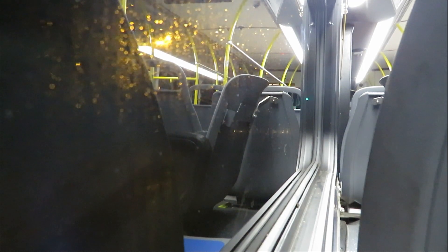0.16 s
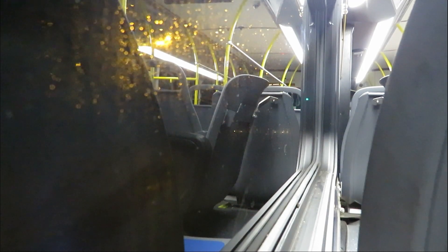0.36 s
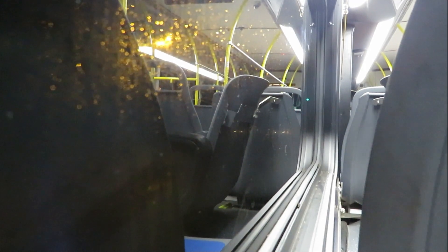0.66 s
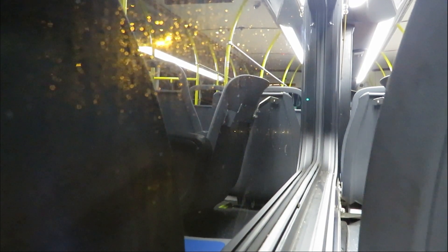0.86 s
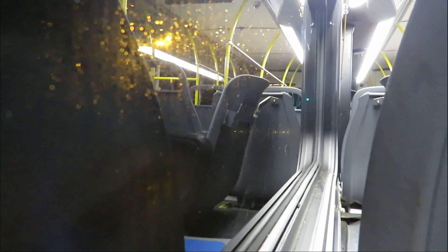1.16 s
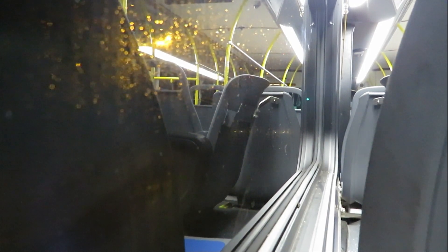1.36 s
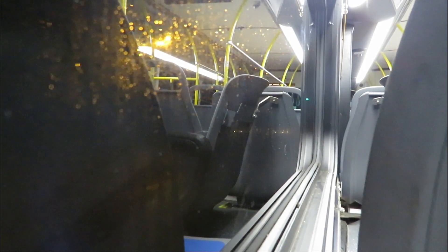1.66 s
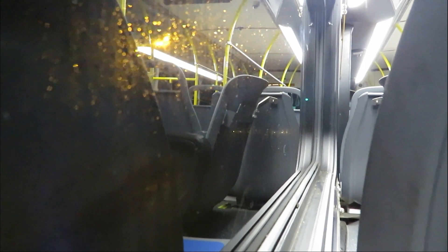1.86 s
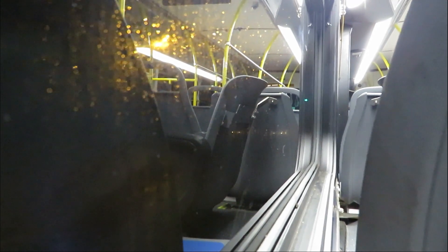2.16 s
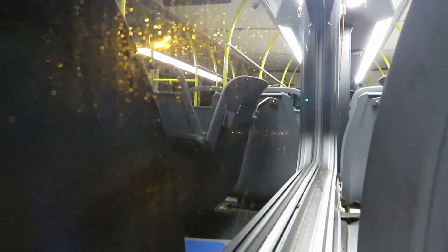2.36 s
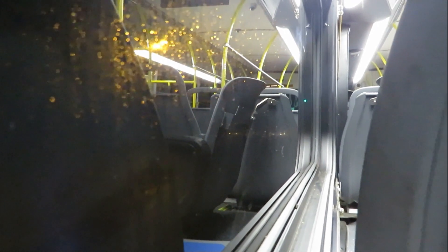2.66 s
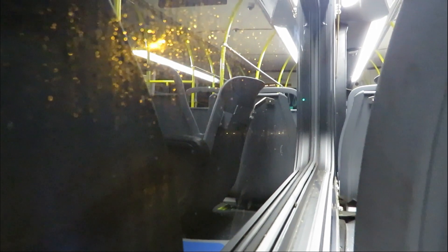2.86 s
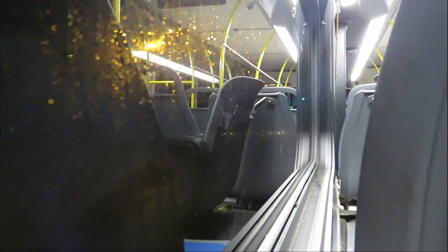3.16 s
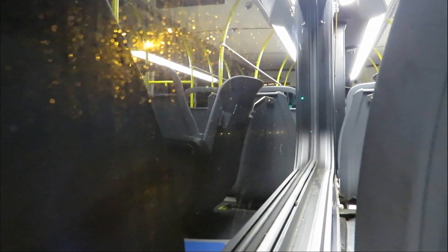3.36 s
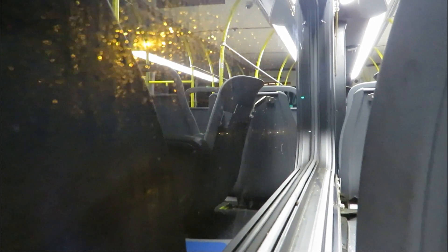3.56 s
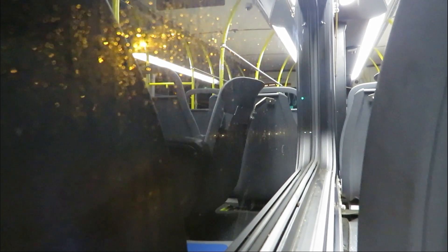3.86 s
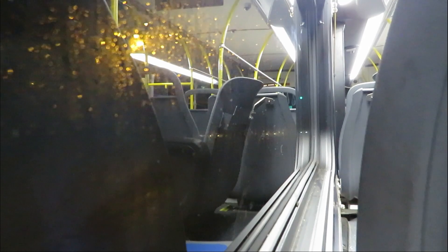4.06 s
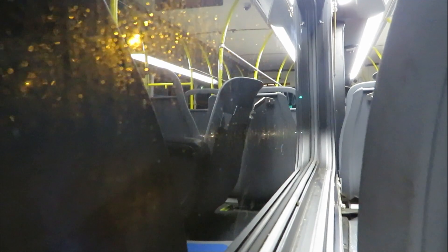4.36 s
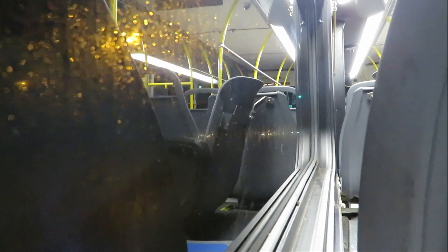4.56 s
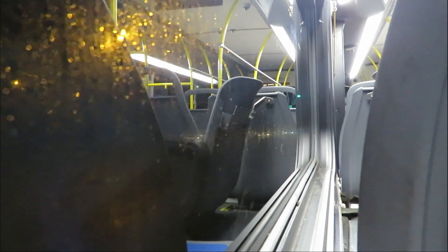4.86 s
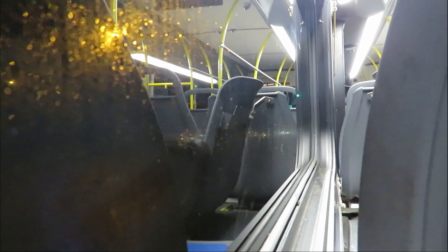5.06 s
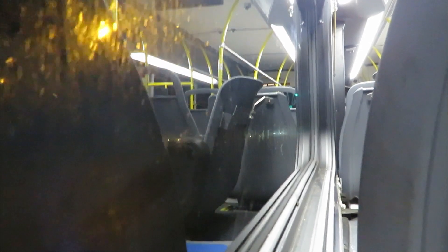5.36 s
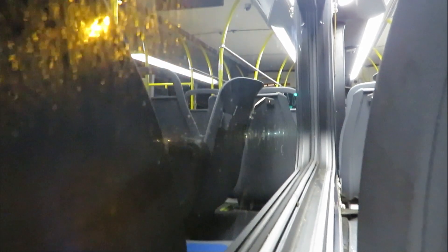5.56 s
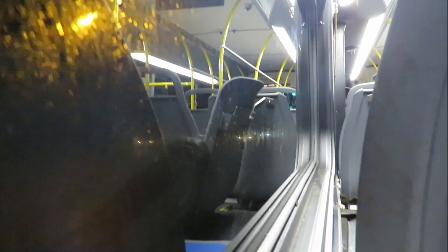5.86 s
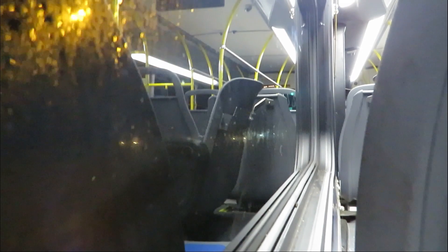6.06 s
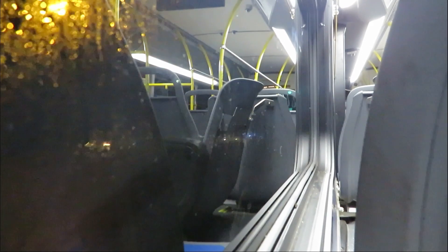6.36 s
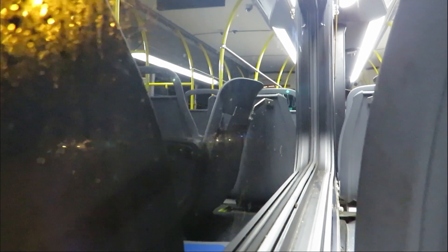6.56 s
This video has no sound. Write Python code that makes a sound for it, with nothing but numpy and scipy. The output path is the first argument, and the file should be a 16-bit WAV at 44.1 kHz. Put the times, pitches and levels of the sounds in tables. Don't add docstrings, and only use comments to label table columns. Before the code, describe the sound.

Inside an empty electric bus, close to a window, fans and a compressor drone low and steady. After a second the brakes let out a short airy hiss with brief hollow moans. Then the motor takes up, its deep hum climbing smoothly and swelling as it meets cabin resonances. Near the end, bumps thud, fittings tick, metal squeaks and a scrape grows.

```python
import sys
import numpy as np
from scipy import signal
from scipy.fft import rfft, irfft, next_fast_len
from scipy.io import wavfile
from scipy.ndimage import uniform_filter1d, map_coordinates

SR = 44100
rng = np.random.default_rng(int(sys.argv[2]) if len(sys.argv) > 2 else 0)


def gain_from_db(level_db):
    decades = np.asarray(level_db, float) / 20
    return 10 ** decades


def materialize(psi):
    bounded = np.clip(np.atleast_2d(psi).T, -1, 1)
    quanta = np.round(bounded * 32767).astype(np.int16)
    wavfile.write(sys.argv[1], SR, quanta)


N = 295911

# f/Hz, side over mid level/dB
STEREO_WIDTH = [(60, -32), (110, -26.5), (200, -24.5), (360, -20), (640, -31.5), (1160, -12.5),
                (2100, -15.5), (3810, -8.5), (6890, -3), (12500, 3.5)]
# t/s, level/dB
BACKGROUND_LEVEL = [(0, -30), (.25, -30), (.45, -33), (.8, -31), (1, -31), (1.65, -33), (1.95, -31), (2.75, -31),
                    (3.02, -33.5), (3.5, -32), (3.9, -32), (4.1, -35.5), (4.55, -32.5), (4.72, -35.5), (5.15, -32),
                    (5.9, -33.5), (6.15, -31.5), (6.45, -33.5)]
# f/Hz, density level/dB
VENT_AIR = [(260, -45), (450, -1.5), (504, -1.5), (778, -8.5), (961, -8), (1110, -11), (1480, -16),
            (2680, -19), (5330, -33.5), (10600, -53), (12900, -71), (16800, -98), (22000, -120)]
# f/Hz, density level/dB
BODY_RUMBLE = [(8, -33), (30, -30), (38, -21), (50, -2.5), (90, -6.5), (135, -6.5), (185, -1.5), (260, -5),
               (350, -11.5), (500, -16.5), (800, -27.5), (1200, -71)]
# f/Hz, rms level/dB, width/Hz
DRONE_LINES = [(48.56, -28.5, 3), (96.85, -26.5, 5), (288.8, -26.5, 4), (414.3, -27, 5), (503, -36.5, 8),
               (557, -40, 8), (987, -39.5, 22), (3960, -57.5, 4.8)]
# t/s of the crest, level/dB, length/s
ROAD_BUMPS = [
    (5.372, -24.5, 0.11),
    (5.58, -21.5, .16),
    (6.15, -28.5, .3),
    (6.52, -25.5, .08),
    (6.71, -19, .06),
]
# f/Hz, density level/dB
AXLE_THUD = [(25, -31), (48, 0), (110, -8), (220, -30), (400, -70)]
# t/s, peak level/dB, centre f/Hz, width/octaves, t60/s
RATTLES = [
    (0.86, -44, 6500, .4, .3),
    (2.265, -44, 7000, .6, .05),
    (3.66, -49, 9000, .4, .04),
    (6.655, -38, 4000, .6, .1),
    (4.014, -32, 5000, 1.2, .035),
    (5.318, -34, 4800, .5, .07),
    (5.455, -38, 5200, .75, .2),
]
# t/s, length/s, f/Hz, level/dB, echo level/dB
SQUEAKS = [
    (5.535, .05, 6320, -48.5, -4),
    (5.6, .04, 6180, -53, -1),
    (5.533, .045, 8560, -48, -5),
    (6.543, .065, 3920, -41, -8),
    (6.56, .045, 7420, -52, -4),
    (6.56, .04, 12550, -66, -8),
]
# f/Hz, density level/dB
SCRAPE_SPECTRUM = [(880, -36.5), (1500, -3.5), (2270, -5), (3170, -13.5), (4040, -13.5), (6570, -25.5),
                   (7120, -15.5), (12900, -44), (16800, -79), (22000, -120)]
# f/Hz, width/Hz, level/dB
SCRAPE_PEAKS = [(2290, 80, 6), (3920, 200, 4), (6000, 220, 12), (6930, 150, 6), (7500, 300, 3)]
# f/Hz, density level/dB
VALVE_JET = [(820, -43), (1400, -8.5), (1670, -3), (1900, -4.5), (2630, -4.5), (2860, -6), (4000, -8),
             (8900, -22.5), (11500, -32.5), (12900, -39.5), (16800, -63.5), (22000, -120)]
# f/Hz, density level/dB
VALVE_PUFF = [(300, -40), (550, -9.5), (900, 6), (1300, 0.5), (1600, -25.5)]
# f/Hz, width/Hz, level/dB
OPENING_PEAKS = [(2170, 120, 4), (2420, 100, 0), (3240, 140, 9), (6430, 150, 3)]
# f/Hz, width/Hz, level/dB
CLOSING_PEAKS = [(1615, 130, 5.9), (2200, 60, 4), (2570, 70, 5.4), (2900, 80, 3.7)]
# t/s, length/s, f/Hz, glide/(Hz/s), level/dB
MOAN_NOTES = [
    (1.25, .04, 427, 0, -25),
    (1.345, .05, 505, 0, -17),
    (1.525, .15, 445, 0, -19),
    (1.7, .055, 430, -600, -20),
    (2.36, .14, 76, 110, -22),
    (4.44, .15, 366, 110, -28),
]
# f/Hz, width/Hz, level/dB
CABIN_MODES = [(68, 8, 0), (85, 7, -3), (100, 3.5, -2), (116, 4, 1), (128, 3, -6), (146, 6, 1),
               (167, 3.5, -4), (177.5, 6, 4), (196.5, 4, 2), (206, 4, -8), (229, 4, 1), (237, 4, -4),
               (249, 4, -7), (294, 6, -2), (310, 6, -5), (334, 5, -11), (347, 6, -9), (365, 9, -6),
               (387, 5, -8), (615, 14, -2)]
# t/s, f/Hz
MOTOR_SPEED = [(2.6, 36), (4.01, 179), (4.54, 229), (4.78, 247), (5.2, 293), (6.71, 423)]
# t/s, main order level/dB, half order level/dB
MOTOR_LOAD = [(2.9, -15.5, -50), (3.2, -14.5, -35), (4.0, -14.5, -26.5), (4.8, -17, -33), (5.2, -18, -25),
              (5.5, -17.5, -21), (5.64, -20, -23), (5.77, -20.5, -15.5), (6.1, -23, -18.5),
              (6.35, -19.5, -21), (6.71, -16.5, -16)]
# multiple of the main order, level/dB relative to it
MOTOR_OVERTONES = [(1.5, -20), (1.64, -20), (2, -15), (3, -20)]

VALVE_OPEN_S, VALVE_TURN_S, VALVE_SHUT_S = 1.017, 1.13, 1.36
HISS_DB, TURN_DIP_DB = -28.5, 2
PUFF_DB, PUFF_STAYS_DB = -25, -19.5
SCRAPE_S, SCRAPE_DB, SCRAPE_GROWS_DB_PER_S = 6.505, -43, 8
ECHO_T60_S = .55
PULL_S, TAKE_UP_S = 2.647, .2
DUCK_DB, DUCK_KNEE_DB, DUCK_RECOVER_S = 2, -15, 0.15


def unit(x):
    return x / np.sqrt(np.mean(x ** 2) + 1e-20)


def along(points, hz):
    f, value = np.transpose(points)
    return np.interp(np.log(hz + 1), np.log(f + 1), value)


def curves(rows):
    s, *columns = np.transpose(rows)
    return [np.interp(np.arange(N) / SR, s, column) for column in columns]


def wobble(rate):
    knots = rng.standard_normal(int(N * rate / SR) + 4)
    return map_coordinates(knots, [np.arange(N) * rate / SR])


def filtered(x, response):
    m = next_fast_len(N + SR // 2)
    return irfft(rfft(x, m) * response(np.fft.rfftfreq(m, 1 / SR)), m)[..., :N]


def rush(spectrum, patchy_db, peaks=()):
    z = signal.stft(rng.standard_normal((2, N)), nperseg=512)[2]
    field = uniform_filter1d(rng.standard_normal(z.shape[1:]), size=6, axis=0)
    field = uniform_filter1d(field, size=12, axis=1)
    pair = signal.istft(z * gain_from_db(patchy_db * unit(field)), nperseg=512)[1][:, :N]

    def response(hz):
        lift = sum(db / (1 + (2 * (hz - c) / w) ** 2) for c, w, db in peaks)
        return gain_from_db(along(spectrum, hz) + lift) * [hz ** 0, gain_from_db(along(STEREO_WIDTH, hz))]

    mid, side = filtered(pair, response)
    return unit(np.array([mid + side, mid - side]))


def burst(start, rise, sag_db, end=np.inf, dies_db=0):
    t = np.arange(N) / SR - start
    decay_db = sag_db * np.maximum(t, 0) + dies_db * np.clip(t + start - end, 0, 9)
    return np.clip(t / rise, 0, 1) ** 2 * gain_from_db(-decay_db)


def background():
    t = np.arange(N) / SR
    air = gain_from_db(7.5 + 0.12 * wobble(8) + .4 * wobble(20)) * rush(VENT_AIR, patchy_db=1)
    rumble = gain_from_db(15.0 + 0.53 * wobble(4.625)) * rush(BODY_RUMBLE, patchy_db=1.23)
    lines = 0
    for hz, db, width in DRONE_LINES:
        strength = gain_from_db(db + 2 + 2.3 * wobble(width))
        lines = lines + strength * np.sin(2 * np.pi * hz * t + 1.12 * wobble(width))
    return gain_from_db(curves(BACKGROUND_LEVEL)[0]) * (air + rumble + gain_from_db(31.0) * lines)


def road():
    t = np.arange(N) / SR
    heave = rush([(8, -30), (16, 11.0), (24, 24.5), (36, -6.0), (50, -54.5)], patchy_db=1)
    thud = gain_from_db(-2) * rush(AXLE_THUD, patchy_db=1.5)
    bumps = sum(gain_from_db(db) * np.exp(-((t - s) / length) ** 2) for s, db, length in ROAD_BUMPS)
    return bumps * (heave + thud)


def rattles():
    out, t = np.zeros((2, N + SR)), np.arange(SR // 2) / SR
    f = np.fft.rfftfreq(len(t), 1 / SR) + 1
    tilt = 1 / f
    for s, db, hz, octaves, t60 in RATTLES:
        shared, own = rng.standard_normal(len(t)), rng.standard_normal((2, len(t)))
        shape = tilt * np.exp(-(np.log2(f / hz) / octaves) ** 2)
        band = irfft(rfft(shared + 0.51 * own) * shape, len(t))
        envelope = gain_from_db(db + 1.5 - 60 * t / t60) * (1 - np.exp(-t * 50 / t60))
        out[:, round(s * SR):][:, :len(t)] += envelope * unit(band)
    return out[:, :N]


def squeaks():
    out, t = np.zeros((2, N + SR)), np.arange(SR // 2) / SR
    for s, length, hz, db, echo_db in SQUEAKS:
        slip = .055 * np.cumsum(rng.standard_normal(len(t)))
        envelope = np.clip(np.minimum(t / 0.013, (length - t) / 0.0074), 0, 1)
        ring = np.sin(2 * np.pi * hz * t + slip) * envelope
        room = rng.standard_normal((2, len(t))) * gain_from_db(-60 * t / ECHO_T60_S)
        room = room / np.linalg.norm(room[0])
        echo = signal.fftconvolve(ring[None], room, axes=1)[:, :len(t)]
        out[:, round(s * SR):][:, :len(t)] += gain_from_db(db + 5.0) * (ring + gain_from_db(echo_db + 4) * echo)
    return out[:, :N]


def scrape():
    grain = gain_from_db(SCRAPE_DB + 9.0 + 1.3 * wobble(40))
    swell = burst(SCRAPE_S, rise=0.055, sag_db=-SCRAPE_GROWS_DB_PER_S)
    return swell * grain * rush(SCRAPE_SPECTRUM, patchy_db=1.0, peaks=SCRAPE_PEAKS)


def brakes():
    t = np.arange(N) / SR
    shut = np.pi / 2 * np.clip((t - VALVE_TURN_S) / .12, 0, 1)
    opening = np.cos(shut) * rush(VALVE_JET, patchy_db=2.0, peaks=OPENING_PEAKS)
    closing = np.sin(shut) * rush(VALVE_JET, patchy_db=1.5, peaks=CLOSING_PEAKS)
    flow = gain_from_db(HISS_DB - TURN_DIP_DB * np.sin(2 * shut))
    flow = flow * burst(VALVE_OPEN_S, rise=.03, sag_db=0.5, end=VALVE_SHUT_S, dies_db=115)
    puff = gain_from_db(PUFF_DB) * burst(VALVE_OPEN_S, rise=0.014, sag_db=110) + gain_from_db(PUFF_STAYS_DB) * flow
    hiss = gain_from_db(5.0 + 0.67 * wobble(29.9)) * flow * (opening + closing)
    return hiss + puff * rush(VALVE_PUFF, patchy_db=3.0)


def moans():
    t = np.arange(N) / SR
    out = np.zeros(N)
    for s, length, hz, glide, db in MOAN_NOTES:
        swell = np.clip(np.minimum(t - s, s + length - t) / .015 + .5, 0, 1)
        tone = np.sin(2 * np.pi * (hz + glide * (t - s) / 2) * (t - s))
        out += gain_from_db(db + 2.5 + 1.2 * wobble(25.3)) * swell * tone
    return out


def motor():
    hz = uniform_filter1d(curves(MOTOR_SPEED)[0], size=4000)
    turn = 2 * np.pi * np.cumsum(hz * (1 + .002 * wobble(12))) / SR
    scale = np.arange(1300)
    cabin = gain_from_db(-22.0) + sum(gain_from_db(db) * np.exp(-((scale - c) / w) ** 2) for c, w, db in CABIN_MODES)

    def order(k):
        return np.interp(k * hz, scale, cabin) * np.sin(k * turn)

    main = order(0.99) + sum(gain_from_db(db + 0.63 * wobble(3.7)) * order(k) for k, db in MOTOR_OVERTONES)
    main_db, half_db = curves(MOTOR_LOAD)
    return burst(PULL_S, TAKE_UP_S, 0) * (gain_from_db(main_db + 3) * main + gain_from_db(half_db + 3.5) * order(.5))


def ducking(boom):
    keep = np.exp(-1 / (DUCK_RECOVER_S * SR))
    power = signal.lfilter([1 - keep], [1, -keep], boom ** 2)
    return -DUCK_DB * np.log10(1 + power / gain_from_db(2 * DUCK_KNEE_DB))


def scene():
    tones = moans() + motor()
    fittings = rattles() + squeaks() + scrape()
    return gain_from_db(ducking(tones)) * background() + road() + fittings + brakes() + tones


def low_pass(x):
    return signal.sosfilt(signal.butter(12, 14800, fs=SR, output="sos"), x)


def record(dry):
    x = filtered(dry, lambda hz: gain_from_db([[.15], [-.15]] * np.clip(hz / 200, 0, 1)))
    x = x / (1 + np.abs(x / 1.1) ** 5) ** (1 / 5)
    return low_pass(x)


dry = scene()
out = record(dry)
materialize(out)
```